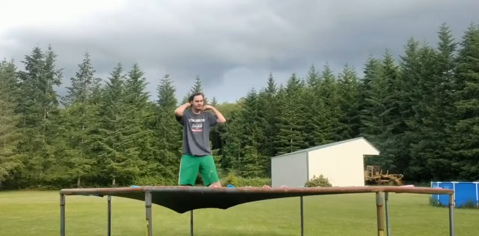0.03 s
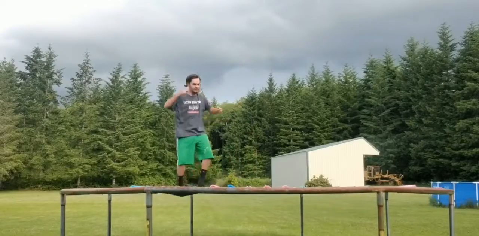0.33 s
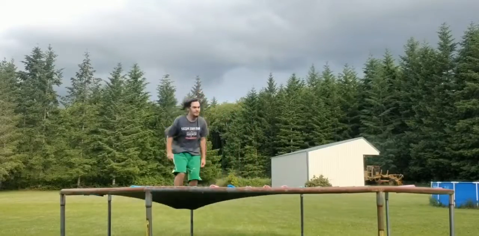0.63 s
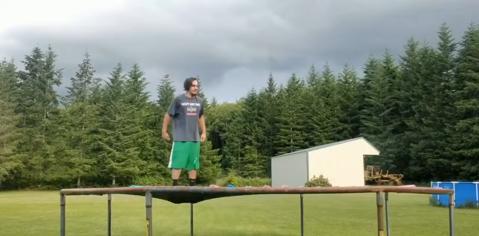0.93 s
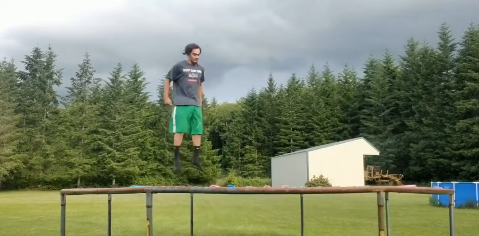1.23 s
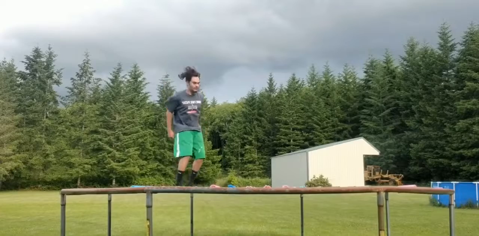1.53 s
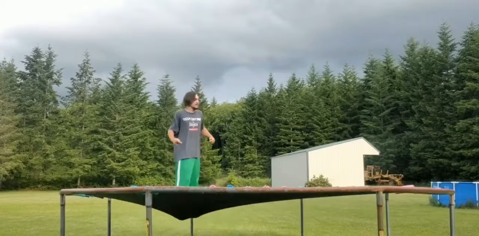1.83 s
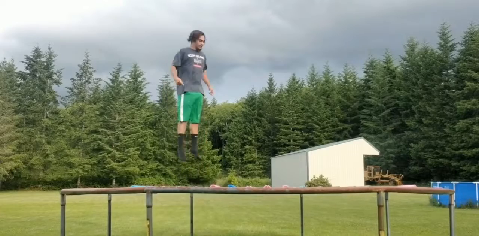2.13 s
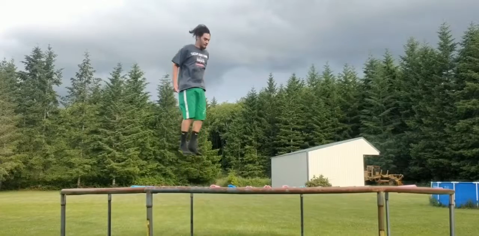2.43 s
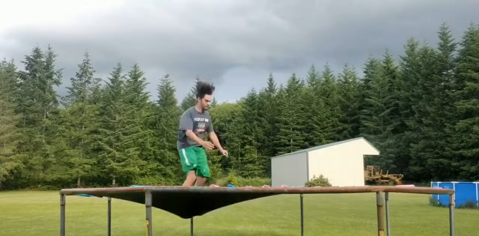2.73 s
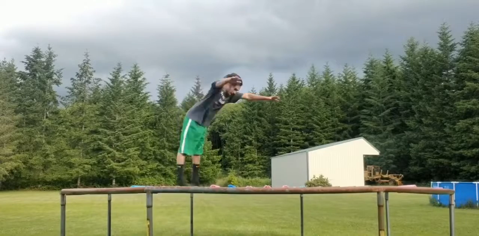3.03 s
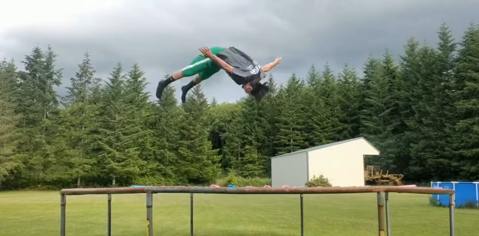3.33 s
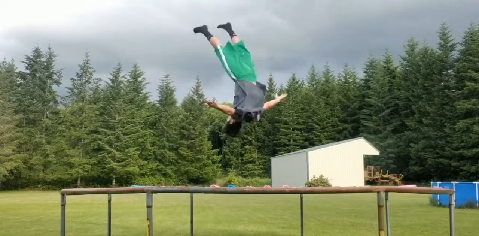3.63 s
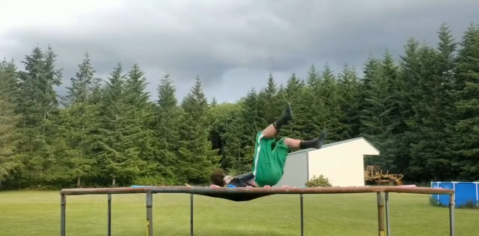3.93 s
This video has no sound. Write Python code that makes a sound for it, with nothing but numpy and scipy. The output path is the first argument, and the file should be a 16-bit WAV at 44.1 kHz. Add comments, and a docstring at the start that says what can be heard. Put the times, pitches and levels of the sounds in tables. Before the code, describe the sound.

Trampoline springs creak and squeak under repeated bounces, with distant traffic behind.

```python
"""A distant engine, a wash of traffic and a thin insect-like trill run throughout.
Someone bounces three times on an old garden trampoline. As the mat stretches and recoils, rusty
spring hooks stick and slip on the frame: they creak, squeak and set the coils ringing.
The jumper takes off into a flip. At 2.8 s the last landing thuds into the mat and cracks
against the frame; a few more creaks follow and the frame tube rings out."""
import sys
import numpy as np
from scipy import signal
from scipy.fft import rfft, irfft
from scipy.io import wavfile
from scipy.ndimage import uniform_filter1d

SR = 44100
rng = np.random.default_rng(int(sys.argv[2]) if len(sys.argv) > 2 else 0)


def put_to_file(sound):
    """Save the sound as 16-bit audio at rate SR, in the file named by the first command-line argument."""
    columns = np.atleast_2d(sound).T  # one column per channel
    safe = np.clip(columns, -1, 1)
    whole_steps = np.round(safe * 32767)
    wavfile.write(sys.argv[1], SR, whole_steps.astype(np.int16))


N = 176400
T, HZ = np.arange(N) / SR, np.fft.rfftfreq(N, 1 / SR) + 1e-3
BODY_EDGE_HZ, RASP_EDGE_HZ = 3500, 8700  # registers, low to high: body, rasp, sizzle

# Engine drone pitch. Each row: time in seconds, pitch in Hz.
DRONE_PITCH = [(1.4, 76.83), (1.65, 75.64)]
# Engine drone level. Each row: time in seconds, level in dB.
DRONE_LEVEL = [(0, -60), (.14, -47), (.6, -47.5), (.9, -39), (1.1, -51.5), (1.28, -40), (1.57, -59),
               (1.72, -45), (2.15, -42.5), (2.82, -48.5), (3.05, -58), (3.24, -41), (3.48, -55),
               (3.63, -48), (4, -51.5)]
# Octave above the drone. Each row: time in seconds, level in dB.
OCTAVE_LEVEL = [(0, -59.5), (.8, -52.5), (1.3, -56.5), (1.7, -63), (2.2, -64), (4, -70.5)]
# Weaker engine lines. Each row: multiple of the shaft rate, level in dB.
SHAFT_LINES = [(2, -64), (4, -58.5)]
# Traffic spectrum. Each row: frequency in Hz, relative density in dB, left minus right in dB.
TRAFFIC_SPECTRUM = [(22.2, -25, 5), (49.8, 5, -0.5), (83, 8, 2.5), (152, -7, 6), (229, -7, 1.5),
                    (272, -13, 4), (550, -12.5, 4), (1063, -6, 3.5), (1367, -13, 6.5), (1775, -19.5, 7.5),
                    (3030, -29.5, 6.5), (5500, -35, 7.5), (8700, -50.5, -3), (11600, -33, -4),
                    (15900, -36.5, -2)]
# Traffic stereo image. Each row: frequency in Hz, left-right correlation.
TRAFFIC_CORRELATION = [(90, 0.96), (250, 0.88), (1000, 0.38), (3000, 0), (12000, 0)]
# Traffic level. Each row: time in seconds, level in dB.
TRAFFIC_LEVEL = [(0, -48), (2.5, -48.5), (4, -51)]
# Trill level. Each row: time in seconds, level in dB.
TRILL_LEVEL = [(2.1, -76), (2.55, -72), (4, -73)]
# Slackening coils. Each row: start and hold in seconds, initial pitch in Hz, level in dB.
ZINGS = [(0.0, 0.016, 2470, -55.5), (1.22, 0.11, 2950, -60.5), (1.343, 0.11, 2570, -60),
         (1.983, 0.07, 2370, -59)]
# Hook creaks. Each row: start, rise and hold in seconds, then body, rasp and sizzle drive in dB.
CREAKS = [(0.125, 0.017, 0.0059, -46, -53.5, -59), (0.47, 0.055, 0.035, -58, -80, -76),
          (0.695, 0.099, 0.026, -47, -53, -70), (0.747, 0.031, 0.042, -46.5, -51, -55),
          (0.862, 0.004, .025, -85, -60, -57.5), (0.985, 0.029, 0.024, -49, -58, -64),
          (1.053, 0.014, 0.033, -47, -56.5, -61), (1.186, 0.02, 0.034, -51.5, -58.5, -61.5),
          (1.695, 0.017, 0.087, -54.5, -67, -66.5), (1.807, 0.043, 0.02, -45.5, -51.5, -57.5),
          (1.878, .01, 0.068, -54.5, -60, -64), (1.958, 0.023, 0.054, -51, -57, -62.5),
          (2.115, 0.023, 0.022, -47.5, -48, -57), (2.571, 0.014, 0.02, -59.5, -63.5, -88),
          (2.835, 0.013, 0.026, -54, -58, -60), (2.889, .01, 0.018, -56, -57.5, -58),
          (2.916, 0.014, 0.016, -44.5, -48.5, -52.5), (2.964, 0.0072, 0.0077, -50, -51, -47.5),
          (3.001, 0.026, 0.052, -54, -58.5, -57.5), (3.089, 0.0082, 0.092, -55, -55.5, -52),
          (3.188, 0.018, 0.0056, -49.5, -56.5, -62), (3.336, 0.05, 0.02, -54, -60.5, -67)]
# Creak spectrum. Each row: frequency in Hz, relative density in dB.
CREAK_SPECTRUM = [(120, -14), (250, -6.5), (500, -6.5), (900, 1.5), (1800, -2.5), (2800, 0), (3600, -5.5),
                  (4500, -8), (6500, -12.5), (8500, -25.5), (10500, -17), (13000, -9), (15500, -19.5)]
# Coil modes. Each row: frequency in Hz, relative energy in dB, T60 in seconds.
COIL_MODES = [(1888, -3, .35), (2030, -5, .3), (2302, -2, .45), (2475, -3, .55), (2768, 0, .35),
              (2908, -1, .3), (4142, -6, .15), (4496, -10, .12), (6905, -14, .15)]
# Rings of the frame tube. Each row: start in seconds, level in dB.
FRAME_RINGS = [(0.14, -64), (3.19, -66), (3.381, -73.5)]
# Frame modes at the landing. Each row: frequency in Hz, relative level in dB, T60 in seconds.
CRACK_MODES = [(1009, -1.5, 0.077), (1270, -7, 0.08), (1465, -12, .1)]
# Hook squeaks. Each row: start and hold in seconds, pitch in Hz, level in dB.
SQUEAKS = [(0.675, 0.098, 4290, -66), (0.74, 0.022, 5650, -65), (0.787, 0.073, 2310, -58),
           (0.792, 0.019, 4100, -48.5), (.793, 0.04, 6900, -64), (1.705, 0.006, 12900, -61),
           (1.708, 0.02, 4300, -57.5), (1.975, .022, 3360, -54), (2.128, 0.059, 13000, -52.5),
           (2.929, 0.021, 12940, -47), (2.936, 0.013, 11640, -54), (2.938, 0.056, 12030, -52)]
# Mat slaps and stretches; the row at 2.848 s is the noisy crack of the landing against the frame. Each row:
# start in seconds, centre and width in Hz, level in dB, decay in seconds.
MAT_BLOWS = [(0.784, 1260, 1000, -50.5, 0.097), (1.72, 720, 654, -50, 0.075), (1.844, 1130, 895, -50, 0.15),
             (2.812, 420, 750, -50.5, 0.017), (2.848, 1130, 690, -46, 0.025), (2.874, 447, 450, -46, 0.034)]
# Mat bottoming out. Each row: start in seconds, pitch in Hz, level in dB.
MAT_THUDS = [(2.801, 76, -41), (2.818, 226, -42), (2.937, 60, -38.5)]


def undb(db):
    """Decibels to gain."""
    return 10 ** (np.asarray(db) / 20)


def unit(x):
    """Scale to rms 1."""
    return x / np.sqrt(np.mean(x ** 2))


def curve(table):
    """Table interpolated over time."""
    return np.interp(T, *np.transpose(table))


def spectrum(table, column=1):
    """Table column interpolated over log frequency."""
    table = np.array(table)
    return np.interp(np.log(HZ), np.log(table[:, 0]), table[:, column])


def pan(db):
    """Stereo gains for a left-minus-right level."""
    gains = undb(np.vstack([db, -db]) / 2)
    return gains / np.sqrt(np.mean(gains ** 2, axis=0))


def stereo(mid, side, correlation):
    """Mix two independent noises to a correlated left and right."""
    return np.sqrt((1 + correlation) / 2) * mid + np.sqrt((1 - correlation) / 2) * np.array([side, -side])


def noise_spectra(correlation):
    """Spectra of stereo white noise."""
    return stereo(*rfft(rng.standard_normal((2, N))), correlation)


def band(hz, width_hz, correlation):
    """Stereo noise in one resonance."""
    detuning = (HZ - hz ** 2 / HZ) / (2.27 * width_hz)
    return unit(irfft(noise_spectra(correlation) / (1 + detuning ** 2), N))


def walk(rate_hz):
    """Smooth random drift, mean 0, rms 1."""
    lowpass = np.exp(-(HZ / rate_hz) ** 2) * (HZ > HZ[0])
    return unit(irfft(rfft(rng.standard_normal(N)) * lowpass, N))


def sine(hz):
    """Tone of rms 1, random phase."""
    return np.sqrt(2) * np.sin(2 * np.pi * (hz * T + rng.random()))


def swell(start_s, rise_s, hold_s, release_s):
    """Linear rise, hold, exponential release."""
    attack = np.clip((T - start_s) / max(rise_s, 1 / SR), 0, 1)
    return attack * np.exp(-np.maximum(T - start_s - rise_s - hold_s, 0) / release_s)


def fade(t60_s):
    """Decay of 60 dB in t60_s."""
    return np.exp(-np.log(1000) * T / t60_s)


def ring(x, response):
    """Convolve with a stereo response scaled to unit energy."""
    response = unit(response) / np.sqrt(response.shape[1])
    return signal.oaconvolve(np.atleast_2d(x), response, axes=1)[:, :N]


def engine(waver_db=3, pan_db=1.5):
    """A far engine drones at three times its shaft rate, wavering on the wind."""
    drone_rad = 2 * np.pi * np.cumsum(curve(DRONE_PITCH)) / SR
    shaft_rad = drone_rad / 3
    lines = [(drone_rad, curve(DRONE_LEVEL)), (2 * drone_rad, curve(OCTAVE_LEVEL))]
    lines += [(multiple * shaft_rad + 1.4 * walk(11.3), db) for multiple, db in SHAFT_LINES]
    hum = sum(undb(db + waver_db * walk(6.5)) * np.sin(phase) for phase, db in lines)
    return pan(pan_db) * np.sqrt(2) * hum


def traffic():
    """Steady tyre wash and rumble under faint hiss."""
    noise = noise_spectra(spectrum(TRAFFIC_CORRELATION))
    colour = undb(spectrum(TRAFFIC_SPECTRUM)) * pan(spectrum(TRAFFIC_SPECTRUM, column=2))
    return unit(irfft(noise * colour, N)) * undb(curve(TRAFFIC_LEVEL) + 0.5 * walk(4.9))


def trill(hz=3973, width_hz=90, pan_db=24):
    """Thin fluttering trill from the trees on the left."""
    return band(hz, width_hz, 0) * undb(curve(TRILL_LEVEL) + 2 * walk(22)) * pan(pan_db)


def zings(sag_hz_per_s=1800, width_hz=210, release_s=0.026, pan_db=4):
    """A rough ring sags in pitch as the coils slacken."""
    out, chatter = 0, 1 + 0.5 * walk(100)
    for start_s, hold_s, hz, db in ZINGS:
        sag_hz = sag_hz_per_s * np.clip(T - start_s, 0, hold_s + release_s)
        shift = np.exp(-2j * np.pi * np.cumsum(sag_hz) / SR)
        zing = np.real(signal.hilbert(band(hz, width_hz, 0.17)) * shift)
        out += undb(db) * swell(start_s, 0.0021, hold_s, release_s) * zing
    return pan(pan_db) * out * chatter


def hook_forces(release_s=0.026, snap_s=1.161, snap_db=(-44, -47, -53)):
    """Force envelope per register: the hooks creak, and one snaps into its seat."""
    creak_power = sum((undb(row[3:])[:, None] * swell(*row[:3], release_s)) ** 2 for row in CREAKS)
    snap = undb(snap_db)[:, None] * swell(snap_s, 0, 0.0038, 0.016)
    return np.sqrt(creak_power + snap ** 2)


def knock(correlation, t60_s=0.03):
    """Frame response to one slip: a short burst of dense modes."""
    return fade(t60_s)[:4096] * stereo(*rng.standard_normal((2, 4096)), correlation)


def springs(slips_per_s=1100, spread_db=3, hooks=4):
    """Irregular hook slips knock the frame in three registers and drive the coils."""
    onsets = rng.random(N) < slips_per_s / SR
    sizes = undb(-spread_db * np.clip(rng.standard_normal(N), -2, 2))
    slips = unit(onsets * sizes * rng.choice([-1, 1], N))
    slips /= np.sqrt(uniform_filter1d(slips ** 2, size=600) + 0.027)  # even out clusters
    # Slipping wanders among the hooks, each with its own knock.
    shares = np.exp([walk(11) for _ in range(hooks)])
    shares /= np.sqrt(np.sum(shares ** 2, axis=0))
    body, below_sizzle = (1 / (1 + (HZ / edge) ** 16) for edge in (BODY_EDGE_HZ, RASP_EDGE_HZ))
    registers = body, below_sizzle - body, 1 - below_sizzle
    pans_db, correlations = (4.5, 1.5, -6), (0.24, -0.12, -0.32)
    out, forces = 0, hook_forces()
    for force, register, pan_db, correlation in zip(forces, registers, pans_db, correlations):
        knocks = sum(ring(slips * force * share, knock(correlation)) for share in shares)
        colour = unit(undb(spectrum(CREAK_SPECTRUM)) * np.sqrt(np.abs(register)))
        out += pan(pan_db) * irfft(rfft(knocks) * colour, N)
    return out + coils(slips * forces[0])


def coils(drive, gain_db=-6.5, wobble_hz=9, pan_db=7.5):
    """The coils ring, their pitch wobbling as the tension changes."""
    response = 0
    for hz, db, t60_s in COIL_MODES:
        mode = np.sin(2 * np.pi * (hz * T[:SR] + rng.random((2, 1))))
        response += undb(db) * fade(t60_s)[:SR] / np.sqrt(t60_s) * mode
    shift_hz = [wobble_hz * walk(10.3) for _ in range(2)]
    wobble = np.exp(2j * np.pi * np.cumsum(shift_hz, axis=1) / SR)
    return undb(gain_db) * pan(pan_db) * np.real(signal.hilbert(ring(drive, response)) * wobble)


def frame(tube_hz=2480, tube_width_hz=55, tube_t60_s=1.6, crack_s=2.845, crack_db=-40.5, pan_db=4):
    """The frame tube rings out near the start and twice near the end; the landing cracks against it."""
    tube_gain = sum(undb(db) * swell(start_s, 0, 0, tube_t60_s / np.log(1000))
                    for start_s, db in FRAME_RINGS)
    crack = sum(undb(crack_db + db) * swell(crack_s, 0.002, 0, t60_s / np.log(1000)) * sine(hz)
                for hz, db, t60_s in CRACK_MODES)
    return pan(pan_db) * (tube_gain * band(tube_hz, tube_width_hz, 0.5) + crack)


def squeaks(jitter_hz=28, roughness=0.75, release_s=0.011, low_pan_db=7, high_pan_db=-8):
    """A hook briefly sings at one unsteady pitch."""
    out, drift_hz = 0, jitter_hz * walk(121)
    chatter = 1 + roughness * np.array([walk(320) for _ in range(2)])
    for start_s, hold_s, hz, db in SQUEAKS:
        phase = 2 * np.pi * np.cumsum(hz + drift_hz) / SR
        tone = np.sqrt(2) * np.array([np.sin(phase), np.cos(phase)])
        pan_db = high_pan_db if hz > RASP_EDGE_HZ else low_pan_db
        out += undb(db) * swell(start_s, 0.002, hold_s, release_s) * tone * pan(pan_db)
    return out * chatter


def mat(blow_rise_s=0.0033, thud_decay_s=0.011, pan_db=3):
    """Feet slap the fabric, which crunches as it stretches and thuds as it bottoms out; the last landing cracks
    against the frame with a noisy burst."""
    blows = sum(undb(db) * swell(start_s, blow_rise_s, 0, decay_s) * band(hz, width_hz, 0.84)
                for start_s, hz, width_hz, db, decay_s in MAT_BLOWS)
    thuds = sum(undb(db) * swell(start_s, 0.002, 0, thud_decay_s) * sine(hz)
                for start_s, hz, db in MAT_THUDS)
    return pan(pan_db) * (blows + thuds)


def tree_echo(sound, gain_db=-8, t60_s=0.57, rise_s=0.051, cutoff_hz=4560):
    """Trees scatter back a faint, dull echo."""
    response = irfft(noise_spectra(0.63), N) * fade(t60_s) * np.clip(T / rise_s, 0, 1)
    lowpass = signal.butter(1, cutoff_hz, fs=SR, output="sos")
    return undb(gain_db) * signal.sosfilt(lowpass, ring(sound, response))


def scene():
    """Trampoline, echo and background."""
    trampoline = springs() + squeaks() + zings() + mat() + frame()
    return trampoline + tree_echo(trampoline) + engine() + traffic() + trill()


def record(dry):
    """Steep low-pass at 15550 Hz."""
    return signal.sosfilt(signal.ellip(10, 0.2, 80, 15550, fs=SR, output="sos"), dry)


dry = scene()
out = record(dry)
put_to_file(out)
```